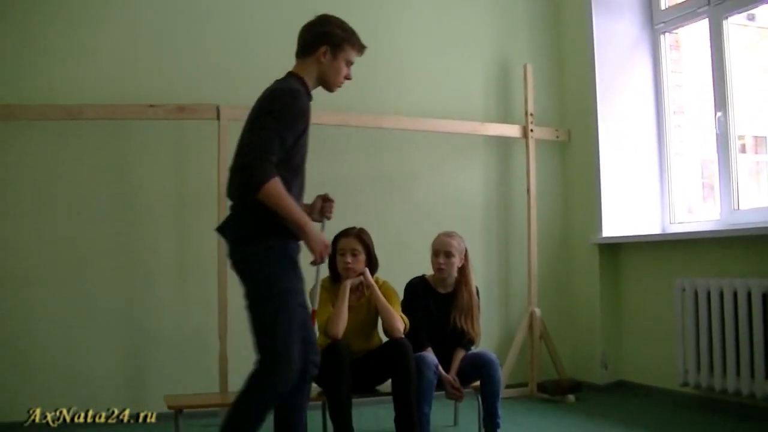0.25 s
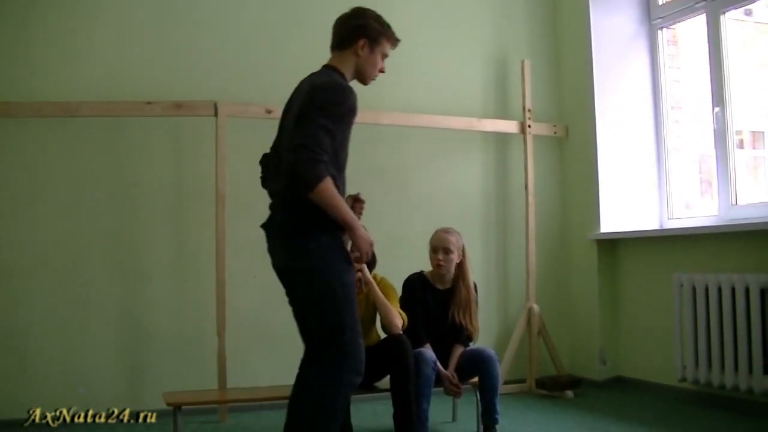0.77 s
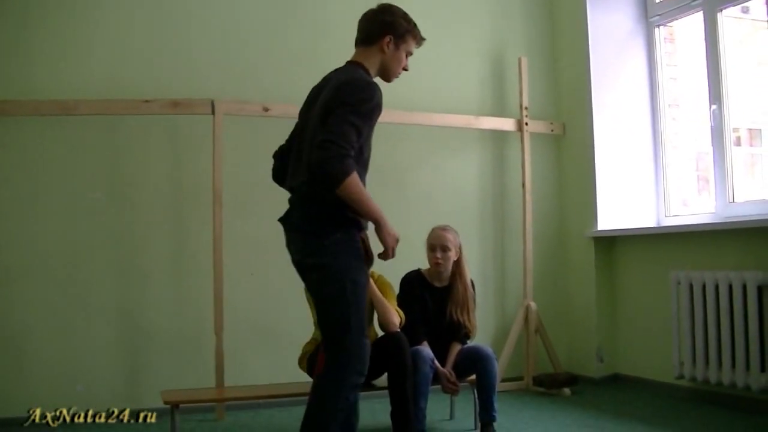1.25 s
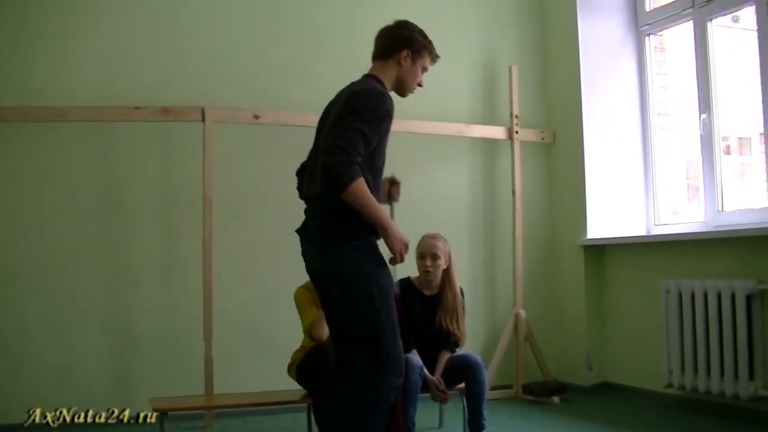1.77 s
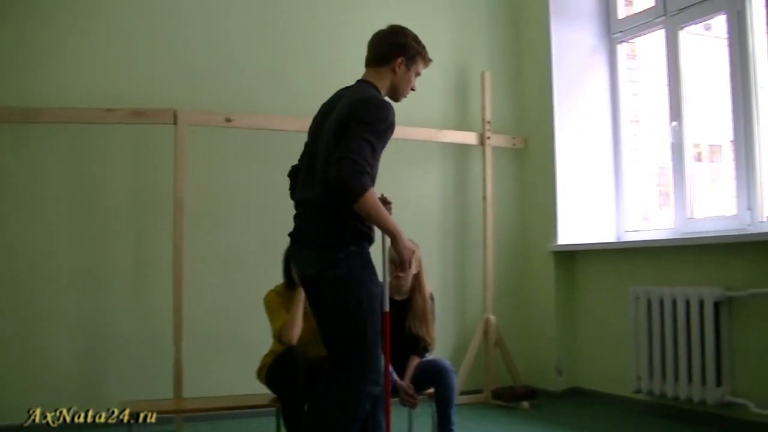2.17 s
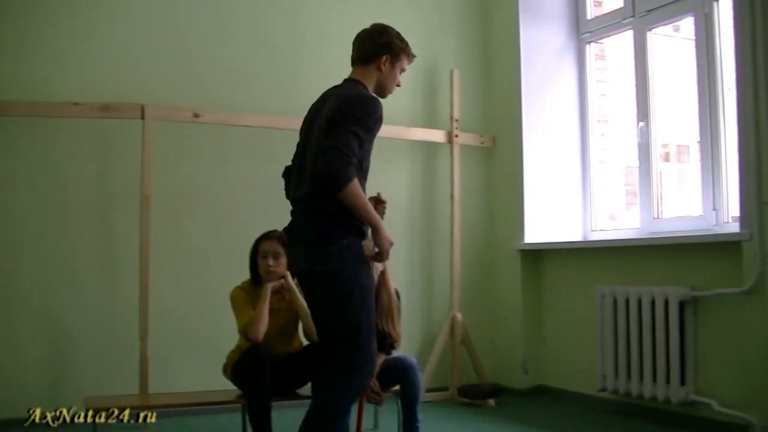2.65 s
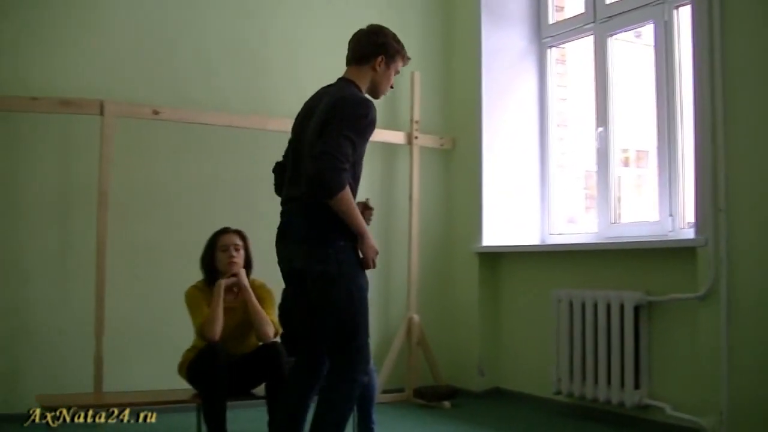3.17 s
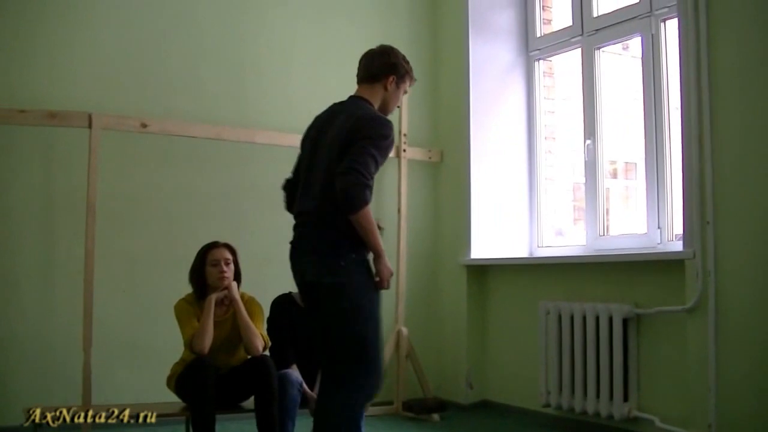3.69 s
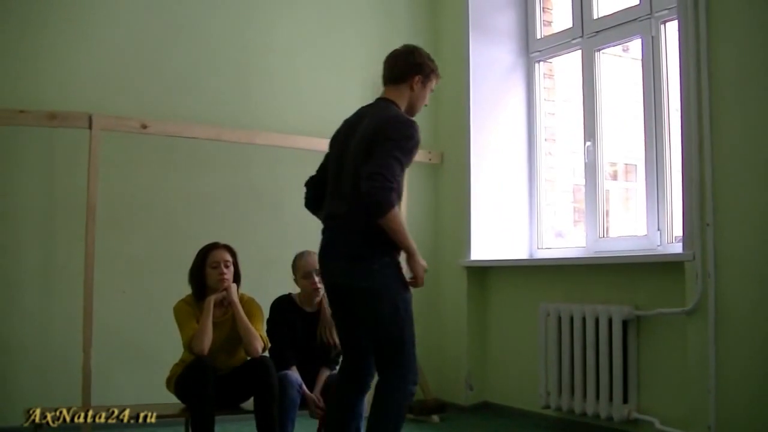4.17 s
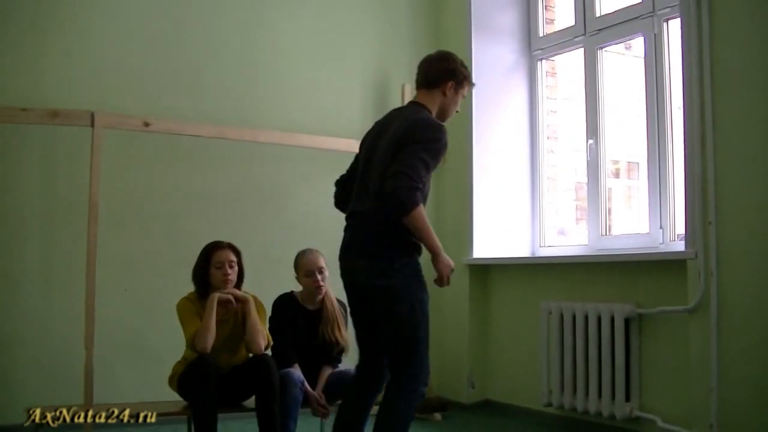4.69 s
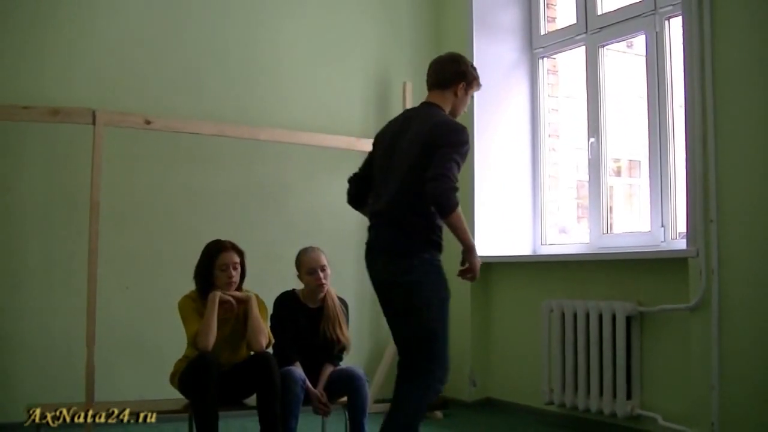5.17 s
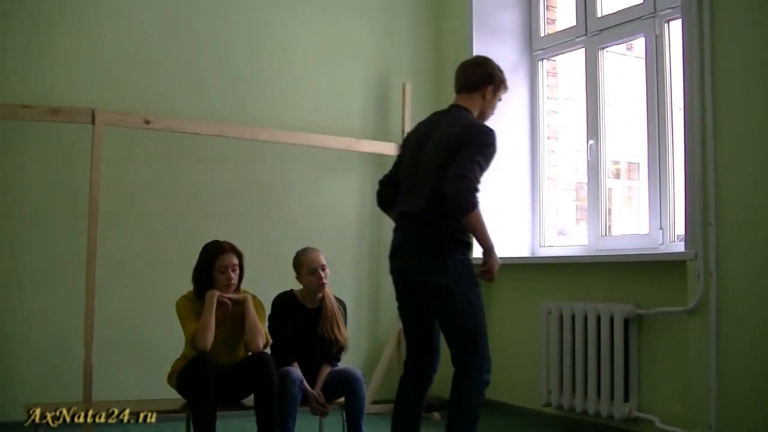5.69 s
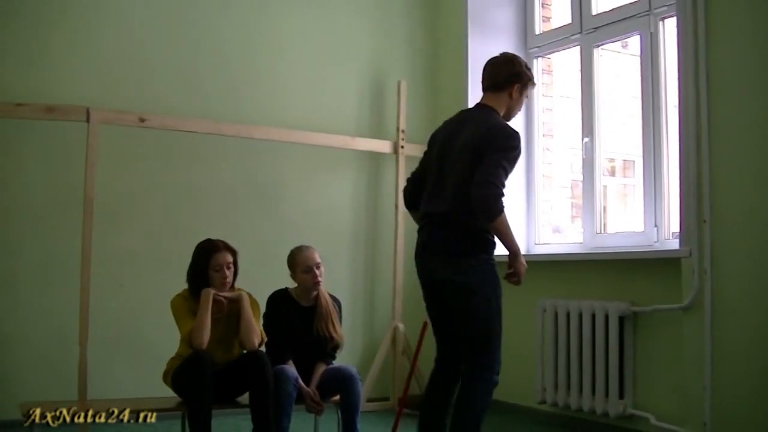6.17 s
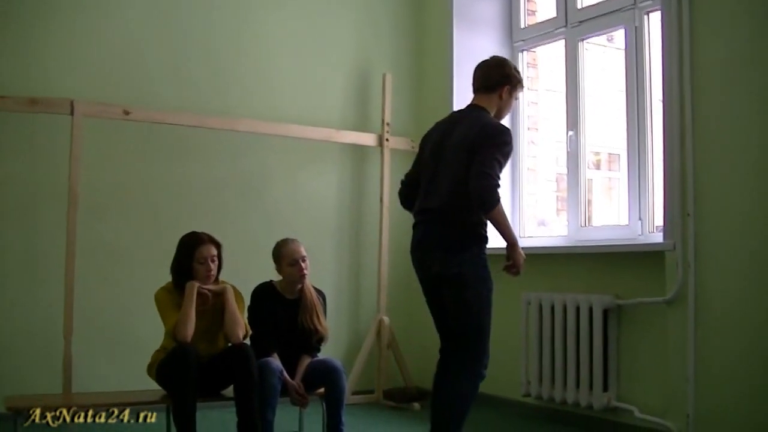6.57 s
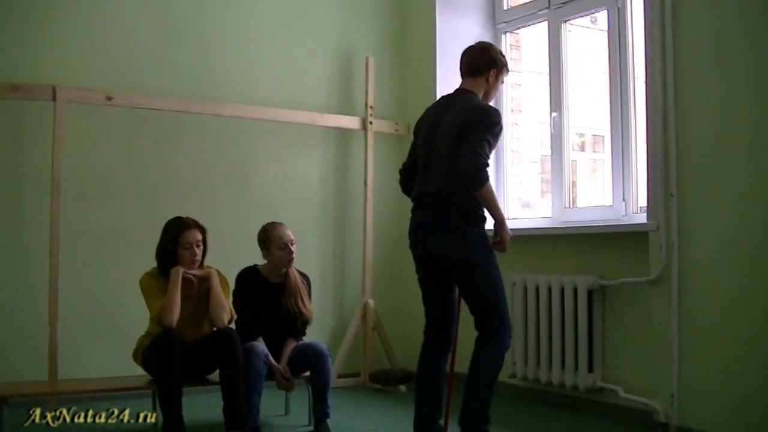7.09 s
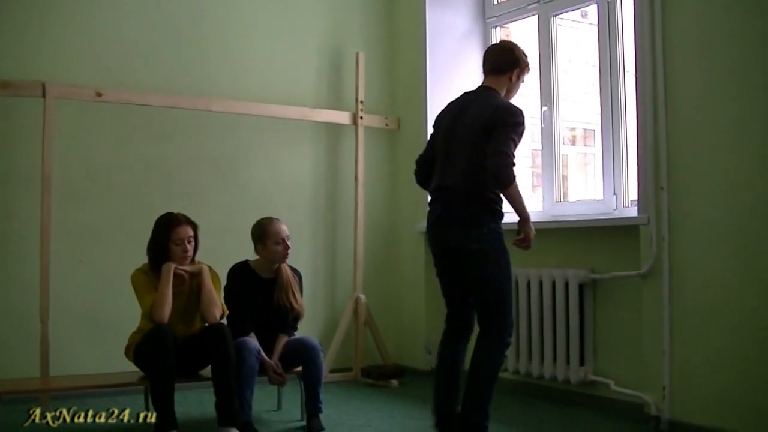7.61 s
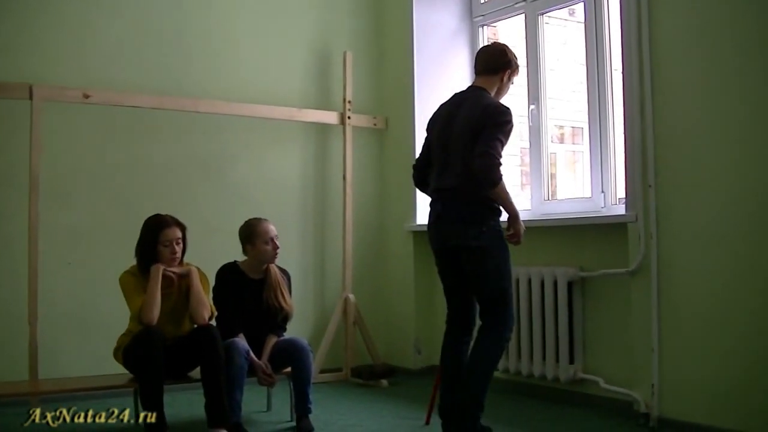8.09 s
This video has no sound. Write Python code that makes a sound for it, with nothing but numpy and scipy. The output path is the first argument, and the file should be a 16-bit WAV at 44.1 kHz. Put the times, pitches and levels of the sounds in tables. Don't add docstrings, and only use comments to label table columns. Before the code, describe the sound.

In a bare, reverberant classroom a walking stick knocks on a covered board floor three times, over two seconds apart, each blow firmer than the last. Every knock is a small tick and a hollow woody thump, ringing for about a second. Between them, much quieter heels thud dully and rubber soles rub and scuff. A small camera microphone adds soft hiss and a faint low hum.

```python
import sys
import numpy as np
from scipy import signal
from scipy.fft import rfft, irfft, next_fast_len
from scipy.io import wavfile
from scipy.ndimage import uniform_filter1d, map_coordinates

SR = 44100
rng = np.random.default_rng(int(sys.argv[2]) if len(sys.argv) > 2 else 0)


def waveform_to_disk(signal):
    frames = np.transpose(np.atleast_2d(signal))
    scaled = np.clip(frames, -1, 1) * 32767
    samples = np.round(scaled).astype(np.int16)
    wavfile.write(sys.argv[1], SR, samples)


def rack_gain(trim_db):
    fader = np.asarray(trim_db, float)
    return 10 ** (fader / 20)


N = 367794


def along(points, hz):
    f, v = np.transpose(points)
    return np.interp(np.log(hz + 1), np.log(f + 1), v)


def wobble(rate):
    knots = rng.standard_normal(int(N * rate / SR) + 4)
    return map_coordinates(knots, [np.arange(N) * rate / SR])


def left_right(mid, side):
    return np.array([mid + side, mid - side])


def add(out, sound, s):
    spot = out[..., round(s * SR):][..., :sound.shape[-1]]
    spot += sound[..., :spot.shape[-1]]


def pulse(gain, size=16384):
    hz = np.fft.rfftfreq(size, 1 / SR)
    cepstrum = irfft(np.log(gain(hz) + 1e-6))
    cepstrum[1:size // 2] *= 2
    cepstrum[size // 2 + 1:] = 0
    shape = irfft(np.exp(rfft(cepstrum)))[:size // 2]
    return shape / np.linalg.norm(shape)


def rush(spectrum, side_db):
    m = next_fast_len(N)
    hz = np.fft.rfftfreq(m, 1 / SR)
    gain = rack_gain(along(spectrum, hz)) * [np.ones_like(hz), rack_gain(along(side_db, hz))]
    mid, side = irfft(rfft(rng.standard_normal((2, m))) * gain, m)[:, :N]
    return left_right(mid, side) / np.std(mid)


def swells(rows):
    t = np.arange(0, N + 32, 32) / SR
    s, held, db, rise, fall = np.transpose(rows)[..., None]
    before = np.clip((s - t) / rise, 0, None)
    after = np.clip((t - s - held) / fall, 0, None)
    power = (rack_gain(db - 20 * (before + after)) ** 2).sum(0)
    return np.interp(np.arange(N) / SR, t, power)


def unheld(rows):
    return np.insert(np.array(rows, float), 1, 0, axis=1)


# (frequency [Hz], width [Hz], lift in blow 1, 2, 3 and under the heels [dB])
BOARDS = [(173.4, 7.7, 5, 4.5, 7.5, 3), (250, 24, 6.5, 0, 6.5, 4.5), (338, 140, 6, 4, 2.5, -2.5),
          (473, 13, 1.5, -5, 0.5, -5), (548, 12, 11.5, 4.5, 6, -4), (603, 29, 2, 4, 6.5, 1),
          (695, 21, -3, -6, 7.5, -2), (806, 48, 5.5, 2.5, 2, -10), (956, 41, -1, 3.5, 10, 5.5),
          (1130, 21, 4, 5, 4.5, -5), (1400, 21, 8, 9.5, 6.5, -11), (1890, 33, -8, 2, -1.5, -3),
          (2150, 56, 5, 9, 5, -3), (2513, 33, 13, 5, 4, -8), (2330, 1000, 4.5, 7, 1.5, 3.5),
          (780, 460, -0.5, 0.5, 3, 3.5)]


def lifted(colour, column):
    def gain(hz):
        peaks = 0
        for row in BOARDS:
            off_centre = 2 * (hz - row[0]) / row[1]
            peaks = peaks + (rack_gain(row[column]) - 1) / (1 + off_centre ** 2)
        return rack_gain(along(colour, hz)) * np.abs(1 + peaks)
    return gain


# (frequency [Hz], time to fall 60 dB [s])
ROOM_DECAY = [(60, 1.92), (160, 1.13), (420, 0.93), (1100, 0.68), (2900, 0.52), (8000, 0.45)]
# (frequency [Hz], side minus mid [dB])
ROOM_SIDE = [(60, -26.5), (110, -20), (200, -43), (380, -32.5), (700, -27.5), (1290, -22.5), (2380, -17),
             (4400, -16), (8120, -6), (15000, -5.5)]


def room(walls, bunches, build, direct_db):
    hz, t, z = signal.stft(rng.standard_normal((2, 2 * SR)), SR, nperseg=512)
    z = z / np.abs(z) ** .3
    z = z * rack_gain(-60 * t / along(ROOM_DECAY, hz)[:, None])
    z = z * rack_gain([0 * hz, along(ROOM_SIDE, hz)])[..., None]
    mid, side = signal.istft(z, SR, nperseg=512)[1]
    t = np.arange(len(mid)) / SR
    flutter = rack_gain(.9 * wobble(70)[:len(t)])
    bunching = rack_gain(np.interp(t, *np.transpose(bunches + [(.35, 0)])))
    swell = (1 - np.exp(-t / build)) * flutter * bunching
    tail = left_right(mid, side) * swell / np.linalg.norm(mid * swell)
    tail[:, 0] += rack_gain(direct_db)
    blur = 0.0001
    for delay, db in walls:
        bump = np.exp(-((t - delay) / blur) ** 2) / (blur * SR * np.sqrt(np.pi))
        tail += rack_gain(direct_db + db) * bump
    return tail


# (time [s], level [dB], room build-up [s], time for the tick to fall 60 dB [s])
KNOCKS = [
    (1.8344, -4.5, 0.0035, .05),
    (4.5156, 1, 0.004, .015),
    (6.565, 4.8, .004, .012),
]
# (frequency [Hz], level per Hz [dB])
BLOW_COLOURS = [
    [(24, -54), (40, -22), (143, -14), (298, -5), (480, -4.5), (596, -12), (789, -4.5), (980, -17.5),
     (1120, -15), (1220, -22.5), (2330, -35.5), (2950, -42), (3430, -39.5), (4850, -50), (7000, -71),
     (9100, -108), (15400, -120)],
    [(24, -52), (40, -28.5), (214, -10.5), (251, -5.5), (337, -11.5), (542, -3.5), (711, -10), (1090, -12),
     (1540, -23), (2470, -26), (3030, -29.5), (3890, -33), (6260, -49), (7180, -60), (9000, -85),
     (11700, -123), (19800, -120)],
    [(24, -59.5), (40, -21.5), (130, -24), (169, -12.5), (216, -14.5), (301, -3), (469, -7.5), (523, -12.5),
     (698, -10.5), (1090, -21.5), (1770, -24.5), (4500, -39), (5490, -46), (6410, -54), (8000, -85),
     (10400, -126), (17600, -120)],
]
# (delay [s], level against the direct sound [dB])
WALLS = [
    [(.006, 13), (.015, 9), (.023, 13), (.058, 10.5)],
    [(.007, -13), (.013, 1), (.019, 2), (.035, 9)],
    [(.009, -1), (.045, 2.5), (.067, 8.5), (.097, 7)],
]
# (time after the blow [s], gain [dB])
BUNCHES = [
    [(0, 1), (.012, 1), (.025, -1), (.045, -3), (.06, -1), (.085, 1), (.13, 1), (.17, -2), (.25, -1)],
    [(0, -5), (.012, -1), (.025, -2), (.045, 1), (.07, 1), (.12, 1), (.18, -3), (.195, 2), (.25, -1)],
    [(0, -6), (.014, -7), (.028, -3), (.045, 0), (.07, 1), (.11, 2), (.15, -3), (.21, 0), (.26, 2)],
]


def stick():
    out, t = np.zeros((2, N)), np.arange(2000) / SR
    blows = zip(KNOCKS, BLOW_COLOURS, WALLS, BUNCHES)
    for k, ((s, db, build, tick_t60), colour, walls, bunches) in enumerate(blows):
        blow = pulse(lifted(colour, column=2 + k))
        echoes = room(walls, bunches, build, direct_db=-20)
        add(out, rack_gain(db) * signal.fftconvolve(blow[None], echoes, axes=1), s)
        boards = pulse(lambda hz: rack_gain(along(colour, hz)) / (1 + (hz / 500) ** 4))
        add(out, rack_gain(-30.5 + 1.5 * db) * boards, s - .0028)
        scrape = uniform_filter1d(rng.standard_normal(len(t)), size=3)
        add(out, rack_gain(db - 59.5 - 60 * t / tick_t60) * scrape, s)
    return out


# (time [s], level [dB], dullness corner [Hz], weight under 130 Hz [dB])
HEELS = [
    (0.0, -48, 510, -1.5),
    (.622, -55, 900, 1.5),
    (2.975, -56.5, 303, 7),
    (3.532, -79, 498, -5),
    (4.294, -51.5, 1070, -30),
    (5.64, -63, 507, -7),
    (7.671, -75, 903, -0.5),
]
# (frequency [Hz], level per Hz [dB])
HEEL_COLOUR = [(24, -63.5), (40, -51.5), (117, -45.5), (134, -19), (283, -13), (319, -11), (732, -16.5),
               (1130, -19), (2140, -8.5), (2500, -38), (3250, -67), (5500, -120)]


def heels():
    out = np.zeros((2, N))
    contact = lifted(HEEL_COLOUR, column=5)
    for s, db, corner_hz, weight_db in HEELS:
        def push_gain(hz):
            thump = rack_gain(weight_db - 7) * (hz / 70) / (1 + (hz / 70) ** 3)
            return contact(hz) / (1 + (hz / corner_hz) ** 8) + thump
        push = pulse(push_gain)
        echoes = room([], [], 0.0047, direct_db=-20)
        add(out, rack_gain(db + 23) * signal.fftconvolve(push[None], echoes, axes=1), s)
    return out


def ring(rows):
    out, t = np.zeros(N), np.arange(2 * SR) / SR
    for s, hz, db, rise, t60 in rows:
        envelope = rack_gain(db - 60 * t / t60) * (1 - np.exp(-t / rise))
        add(out, envelope * np.sin(2 * np.pi * hz * t), s)
    return out


# (time [s], frequency [Hz], level [dB], rise [s], time to fall 60 dB [s])
RINGS = [
    (0, 62.3, -73, 0.037, 1.5),
    (.63, 58.4, -75, .03, 1.8),
    (1.84, 64.6, -61, .03, 2),
    (2.98, 59.9, -66.5, 0.034, 2.5),
    (4.519, 65.3, -51.5, 0.039, 1.1),
    (5.659, 36, -64.5, .04, 6),
    (6.57, 37.6, -70, 0.035, 3.4),
    (6.57, 72, -60, .03, 2),
    (6.6, 386, -50, .05, 1.9),
    (7.12, 36.1, -65, 0.04, 4.7),
]
# (time [s], frequency [Hz], level [dB], rise [s], time to fall 60 dB [s])
BOOMS = [(0, 174, -56, 0.0013, 0.3), (.625, 186, -66, .01, 0.88), (.62, 395, -66, .005, 1.1),
         (4.33, 274, -56, .02, 0.36), (1.84, 297, -22, 0.0095, 0.11), (4.53, 300, -40, .012, 0.16),
         (6.5725, 325, -15.5, .0015, 0.07), (1.8345, 330, -38, .002, .1), (1.837, 780, -38, .001, .08),
         (6.5647, 310, -25, .001, .1), (6.572, 560, -29, .002, .15), (6.572, 960, -30, .001, .12),
         (1.838, 3200, -58, .001, .03), (1.8475, 3400, -56, .002, .04), (1.85, 4300, -59, .002, .04),
         (1.839, 4400, -61, .001, .03), (4.5125, 420, -36, .001, .04), (4.514, 830, -36, .002, .2),
         (4.52, 610, -33, .003, .3), (1.84, 785, -38, .008, .25), (1.842, 670, -42, .01, .15),
         (4.525, 540, -36, .015, .7), (4.53, 258, -46, .02, 1.1), (4.523, 2250, -39, .002, .1),
         (4.555, 2450, -48, .005, .2), (4.7, 650, -44, .004, .15), (4.79, 600, -50, .004, .12),
         (4.53, 964, -44, .01, .5), (1.845, 468, -42, .01, .5), (1.85, 339, -44, .01, .9),
         (6.606, 330, -30, .002, .04), (6.627, 390, -26, .004, .09), (6.58, 608, -36, .01, .5),
         (6.58, 942, -42, .01, .7), (6.815, 330, -38, .006, .15), (6.598, 1750, -46, .002, .06),
         (6.648, 760, -36, .003, .08), (4.52, 800, -40, .008, .2), (6.585, 715, -31, .015, .25),
         (6.58, 177, -36.5, .02, .9)]


def building():
    unsteady = rack_gain(1.5 * wobble(9))
    return ring(RINGS) * unsteady + ring(BOOMS)


# (time [s], held [s], level [dB], rise over 20 dB [s], fall over 20 dB [s])
DRAGS = [(0.0, 0.076, -71, .1, .2), (.166, .001, -62, 0.12, .13), (.476, .001, -63.5, 0.22, 0.14),
         (1.216, .001, -64.5, .26, 0.19), (2.22, 0.13, -69.5, 0.055, 0.49), (2.4, .001, -62, 0.27, 0.079),
         (3.32, 0.054, -70.5, 0.12, 0.066), (3.48, .05, -64, 0.075, 0.18), (3.8, .001, -68.5, 0.17, .2),
         (3.92, .06, -65.5, 0.086, 0.16), (4.86, 0.1, -63.5, .16, 0.18), (5.044, .001, -57.5, 0.085, 0.15),
         (5.324, .001, -65, 0.081, 0.15), (5.56, 0.019, -58.5, 0.34, 0.23), (6.25, 0.16, -62.5, 0.2, 0.14),
         (6.93, .001, -58, 0.19, 0.33), (7.02, 0.1, -62.5, 0.29, 0.097), (7.5, 0.042, -66.5, 0.17, 0.23),
         (7.696, .001, -58, 0.095, .14), (7.874, .001, -74, 0.072, 0.19), (8.166, 0.046, -65, 0.14, 0.64)]
# (time [s], level [dB], rise over 20 dB [s], fall over 20 dB [s])
SCUFFS = [(.642, -57.5, 0.025, 0.14), (.972, -77, .25, .12), (1.672, -54.5, 0.15, 0.15),
          (2.82, -64.5, 0.065, 0.23), (2.96, -53.5, .09, 0.13), (3.54, -64.5, 0.11, 0.093),
          (4.01, -66, 0.11, 0.14), (4.19, -71, .09, 0.19), (4.3, -76, 0.063, .15),
          (5.622, -56.5, 0.088, 0.088), (6.02, -67.5, 0.049, 0.33), (6.075, -61, 0.087, 0.37),
          (6.166, -60, 0.21, 0.19), (6.52, -77, .1, .02), (7.14, -68, .06, 0.091), (8.05, -77.5, .3, .2),
          (8.283, -65, .015, .04)]
# (time [s], level [dB], rise over 20 dB [s], fall over 20 dB [s])
PRESSES = [
    (.53, -70, 0.14, .2),
    (.69, -69, .1, 0.24),
    (1.7, -65.5, 0.25, 0.18),
    (2.89, -71, 0.12, 0.083),
    (3.05, -70.5, 0.14, 0.24),
    (3.56, -73, 0.14, 0.17),
    (4.95, -71, 0.16, 0.46),
    (5.47, -75, 0.096, 0.59),
    (5.57, -66.5, 0.18, 0.4),
    (7.1, -71, 0.35, 0.29),
]
# (frequency [Hz], level per Hz [dB])
SOLE = [(880, -32), (1500, -10), (1570, -14.5), (1650, -10), (1920, -6.5), (2180, -4), (2420, -5),
        (2890, -4.5), (3940, -6), (5580, -6.5), (8460, -16), (12500, -27), (16200, -54.5), (22000, -120)]
# (frequency [Hz], level per Hz [dB])
SOLE_EDGE = [(4500, -17), (7000, 5), (9500, -1.5), (12000, -9.5), (14500, -11), (15600, -18)]
# (frequency [Hz], level per Hz [dB])
SOLE_BODY = [(150, -13), (400, -3.5), (1000, 0.5), (1700, -4), (2400, -25)]
# (frequency [Hz], side minus mid [dB])
SOLE_SIDE = [(300, -21), (2400, -21), (4400, -21), (8000, -15.5), (15000, -25)]


def soles():
    rest = np.full(N, rack_gain(-85.5) ** 2)
    powers = np.array([swells(DRAGS), swells(unheld(SCUFFS)), rest])
    edge_db, body_db = [-18, -7, -1.1], [-10, -13, 3.7]
    edge, body = np.sqrt(rack_gain([edge_db, body_db]) ** 2 @ powers)
    body = np.sqrt(body ** 2 + swells(unheld(PRESSES)))
    layers = np.sqrt(powers.sum(0)) * rush(SOLE, SOLE_SIDE)
    layers = layers + edge * rush(SOLE_EDGE, SOLE_SIDE)
    layers = layers + body * rush(SOLE_BODY, SOLE_SIDE)
    catches = rack_gain(0.74 * wobble(60) + 0.3 * wobble(400))
    return layers * catches / np.sqrt(np.mean(catches ** 2))


# (time [s], level [dB], rise over 20 dB [s], fall over 20 dB [s])
HUM_SWELLS = [
    (0, -73.5, 1, 2),
    (1.35, -81, .7, 2.5),
    (3.8, -77.5, 0.38, 2.6),
    (5, -69.5, 0.73, 0.54),
    (5.9, -78.5, .7, 7.2),
]
# (frequency [Hz], level per Hz [dB])
HISS = [(8.2, -43), (14, -15), (61, -3), (103, -12), (155, -10), (174, -11), (220, -14.5), (304, -12.5),
        (530, -16), (613, -15), (798, -17), (952, -23.5), (1870, -23), (2980, -22.5), (15400, -31)]
# (frequency [Hz], side minus mid [dB])
HISS_SIDE = [(60, -12.5), (110, -6.5), (200, -2.5), (380, -4), (700, -4), (1290, 1), (2380, -4), (4400, -6),
             (8120, -12), (15000, -23)]
# (frequency [Hz], level per Hz [dB])
SHAKE = [(40, -41), (56, 1), (68, 2), (95, -35.5)]


def background():
    t = np.arange(N) / SR
    hum_level = np.sqrt(swells(unheld(HUM_SWELLS)) + rack_gain(-93) ** 2) * rack_gain(2.2 * wobble(4.8))
    hum_hz = 148 + 1.5 * wobble(2.6)
    hum = hum_level * np.sin(2 * np.pi * np.cumsum(hum_hz) / SR)
    pips = np.clip(np.cos(2 * np.pi * 24.6 * (t - .035)), 0, 1) ** 3 * rack_gain(2 * wobble(20))
    trill_level = np.sqrt(swells([(.15, .45, -69.5, 1.5, .1)]))
    trill = trill_level * pips * np.sin(2 * np.pi * 3220 * t)
    joists = rack_gain(-88) * rush(SHAKE, [(60, -20.5)])
    hiss = rack_gain(-72 + 0.36 * wobble(1.8)) * rush(HISS, HISS_SIDE)
    return hiss + joists + hum + trill


# (from [s], to [s], low edge [Hz], high edge [Hz])
STARVED = [(.13, .2, 3500, 5700), (1.7, 1.78, 2600, 5200), (1.86, 1.97, 2900, 5000), (2.6, 2.7, 3600, 5700),
           (2.8, 2.82, 3800, 4500), (2.88, 2.9, 4600, 5400), (2.94, 2.97, 3000, 4600),
           (3.02, 3.07, 4000, 5600), (3.93, 4.0, 3500, 5700), (4.39, 4.42, 3300, 6500),
           (4.54, 4.66, 5000, 7000), (4.66, 4.75, 4400, 7000), (5.29, 5.37, 3500, 5800),
           (5.41, 5.44, 2500, 6800), (5.545, 5.595, 3200, 6800), (5.7, 5.74, 6200, 7500),
           (5.82, 5.85, 3000, 5400), (5.99, 6.05, 3800, 5700), (6.08, 6.21, 3700, 5600),
           (6.67, 6.8, 3600, 5600), (7.05, 7.36, 10000, 14200), (7.44, 7.57, 2400, 6800),
           (7.69, 7.73, 3600, 6000), (8.14, 8.3, 3300, 6800), (1.98, 2.13, 9500, 14000),
           (4.75, 4.9, 10500, 14500), (6.8, 6.97, 9000, 14500)]
# (from [s], top frequency [Hz])
BAND_LIMIT = [(0, 16000), (1.834, 12800), (1.856, 4700), (1.915, 5700), (1.978, 12800), (2.02, 13400),
              (2.05, 12700), (2.105, 14000), (2.17, 16000), (4.501, 8000), (4.5145, 13000), (4.523, 7000),
              (4.575, 6100), (4.61, 5200), (4.665, 6200), (4.7, 7000), (4.73, 8200), (4.753, 12800),
              (4.83, 13200), (4.88, 14200), (4.92, 16000), (6.55, 4500), (6.564, 12500), (6.571, 6300),
              (6.596, 5300), (6.63, 5900), (6.662, 5300), (6.692, 6200), (6.727, 5300), (6.748, 4600),
              (6.778, 6400), (6.8, 10300), (6.865, 13300), (6.895, 12300), (6.945, 13500), (6.97, 16000),
              (7.02, 14300), (7.12, 16000)]


def masked(x):
    hz, t, z = signal.stft(x, SR, nperseg=1024)
    hz = hz[:, None]
    luck = rng.standard_normal((len(hz), len(t)))

    def blocks(v, size, count):
        return np.repeat(np.repeat(v, size, 0), count, 1)[:len(hz), :len(t)]

    busy = np.zeros(luck.shape, bool)
    for start, end, low, high in STARVED:
        busy |= (t > start) & (t < end) & (hz > low) & (hz < high)
    strips = (blocks(luck, size=3, count=4) > .6) | (blocks(luck[::-1], size=6, count=2) > 1.3)
    top_hz = 15000 + 450 * blocks(luck[:1], size=1, count=2)
    kept = np.where(busy, rack_gain(1.5) * ~strips, 1) * (hz < top_hz)
    x = signal.istft(z * kept, SR, nperseg=1024)[1][:, :N]
    hz, t, z = signal.stft(x, SR, nperseg=256, noverlap=192)
    since, limit_hz = np.transpose(BAND_LIMIT)
    limit_hz = limit_hz[np.searchsorted(since, t, side="right") - 1]
    return signal.istft(z * (hz[:, None] < limit_hz), SR, nperseg=256, noverlap=192)[1][:, :N]


def scene():
    return stick() + heels() + building() + soles() + background()


def top_cut(x):
    return signal.sosfilt(signal.butter(12, 15620, fs=SR, output="sos"), x)


def record(dry):
    mix = masked(dry)
    return top_cut(mix)


dry = scene()
out = record(dry)
waveform_to_disk(out)
```